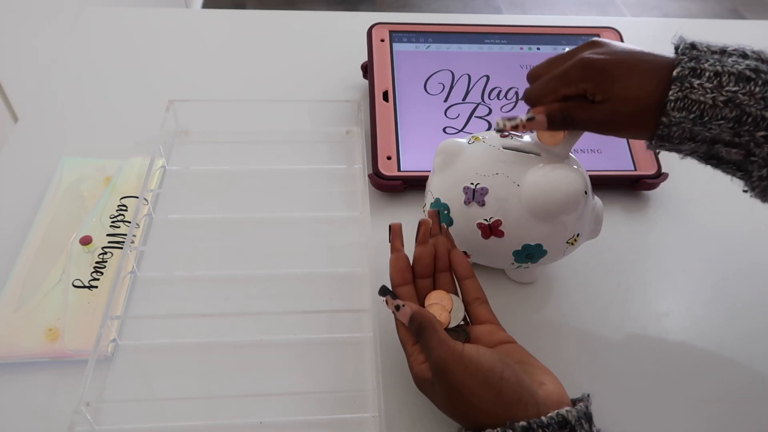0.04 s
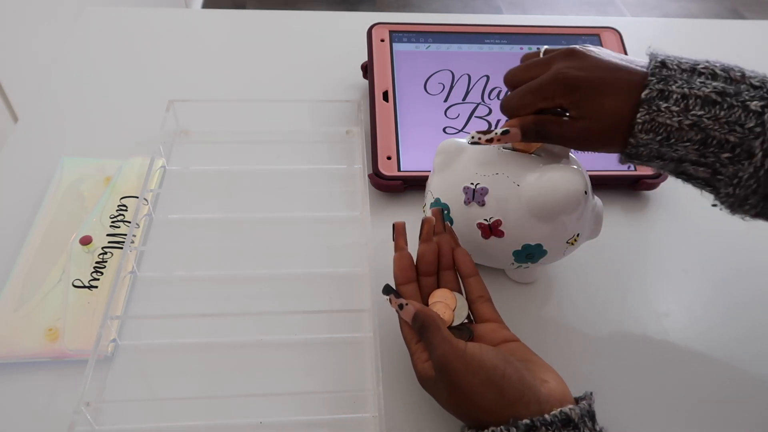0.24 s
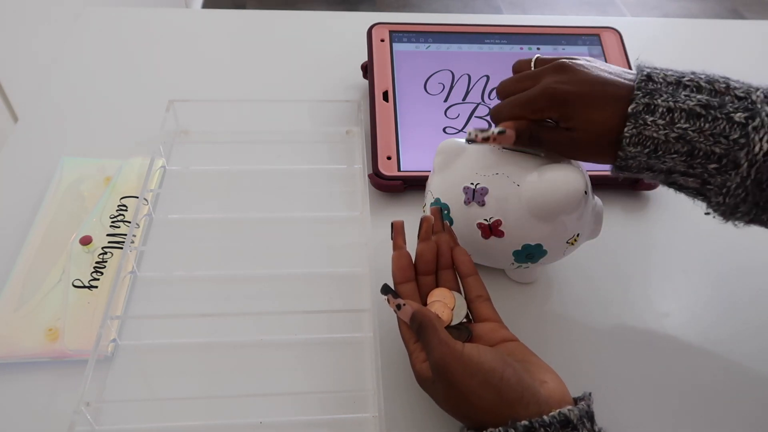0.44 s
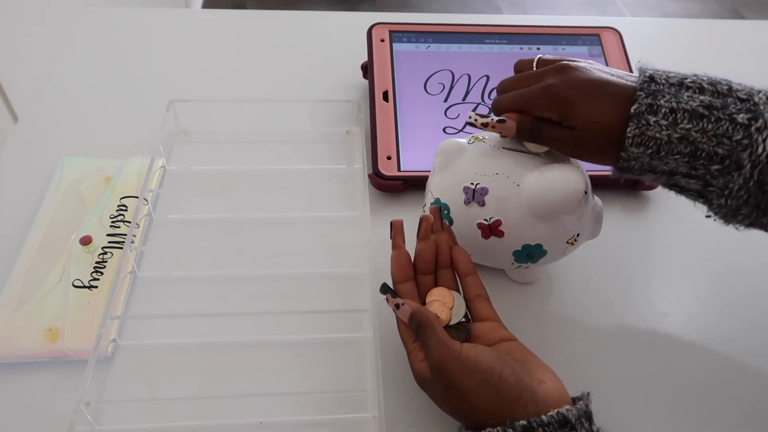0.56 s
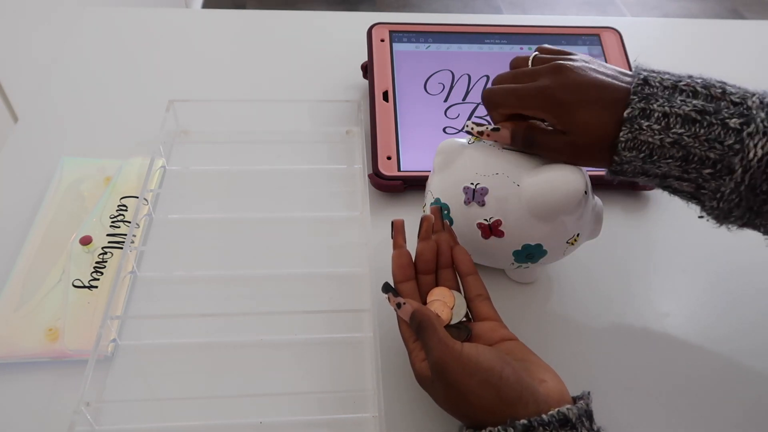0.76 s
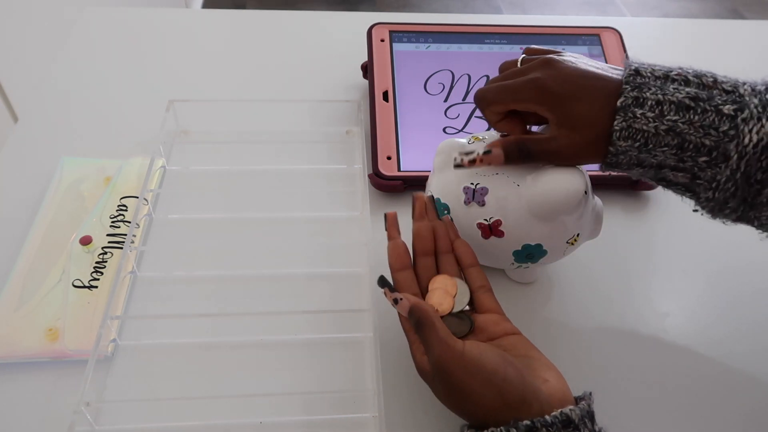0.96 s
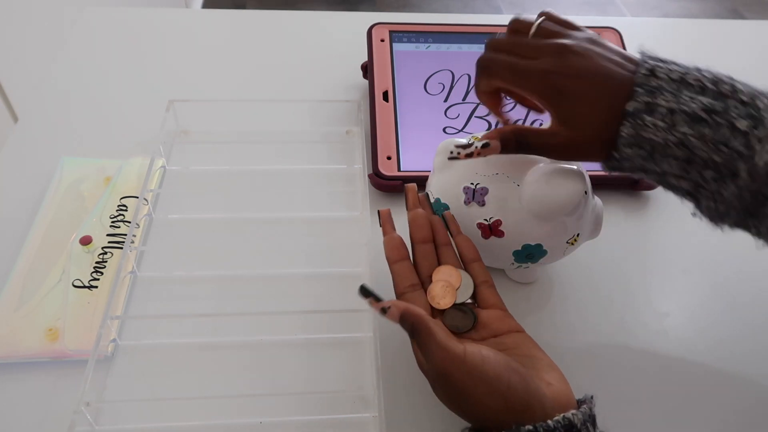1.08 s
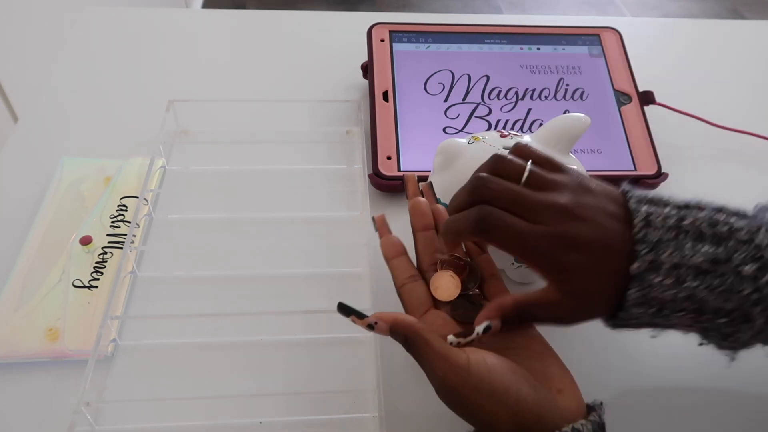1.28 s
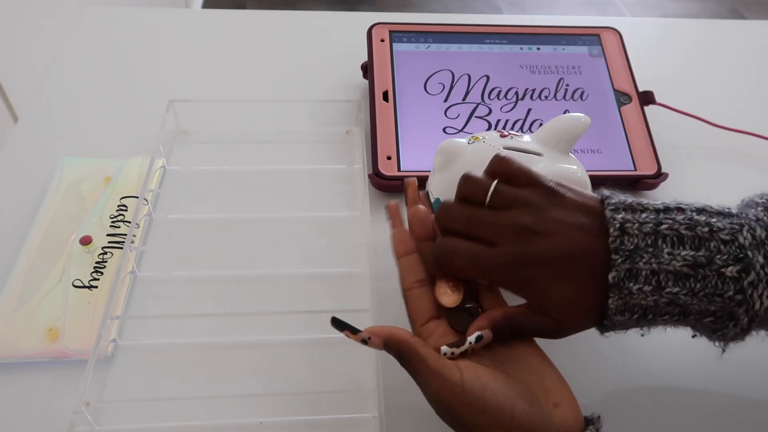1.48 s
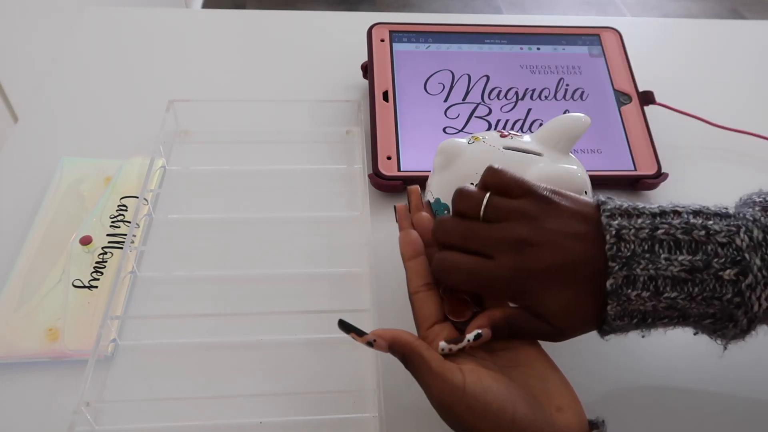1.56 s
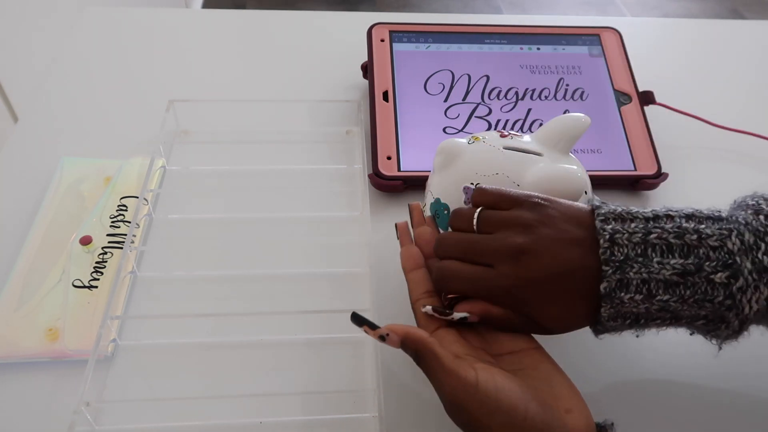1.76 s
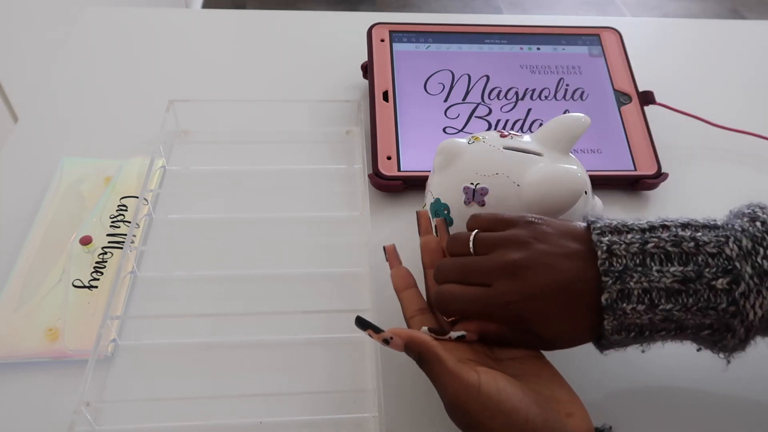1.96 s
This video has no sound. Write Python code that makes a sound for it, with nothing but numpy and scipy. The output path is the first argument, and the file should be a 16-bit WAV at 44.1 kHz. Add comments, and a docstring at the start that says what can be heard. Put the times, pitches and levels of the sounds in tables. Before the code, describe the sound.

Coins dropping into a ceramic piggy bank, clinking and thudding, then faint clicks in a palm

```python
"""Coins into a ceramic piggy bank

Coins are fed one by one into a bank on a table: each ticks against the slot, lands with a thud and clinks
over the coins inside. Then fingers with long nails pick through the coins left in the palm.
Shell, coins and table are decaying sine modes; contacts, slide, sleeve and air are shaped noise.
Each contact and the slide get nearby reflections and a bare room's tail in stereo."""
import sys
import numpy as np
from scipy import signal
from scipy.fft import rfft, irfft, next_fast_len
from scipy.io import wavfile
from scipy.ndimage import uniform_filter1d

SR = 44100
rng = np.random.default_rng(int(sys.argv[2]) if len(sys.argv) > 2 else 0)


def generate_wav(signal):
    """Clip the signal to [-1, 1] and save it as 16-bit WAV at the path in sys.argv[1]."""
    frames = np.transpose(np.atleast_2d(signal))
    scaled = np.clip(frames, -1, 1) * 32767
    pcm = np.round(scaled).astype(np.int16)
    wavfile.write(sys.argv[1], SR, pcm)


N = 89170
T = np.arange(int(0.7 * SR)) / SR  # time axis of one event, s
RING_ATTACK_S = 0.00041  # onset of every shell and coin ring
COIN_SPREAD = 0.0111  # random detuning of coin modes, fraction of pitch
BANK_LEAD_S, PALM_LEAD_S = 0.000014, 0.000017  # how far the left channel leads
THUD_WET_DB, PALM_WET_DB = -1, -3  # trim of the room tail

# modes of the ceramic shell: pitch_hz, level_db (relative), t60_s
SHELL_MODES = [(3654, -12, 0.021), (3920, -7.5, 0.032), (4048, -0.5, 0.035), (4077, -2, 0.02),
               (4344, -6.5, 0.018), (4525, 0, 0.039), (4588, -2, 0.052), (4870, -6, 0.029),
               (5060, -14, 0.025), (5875, -20.5, 0.042)]
# stereo width of room and sleeve: frequency_hz, side_db (against the middle)
DIFFUSE_WIDTH = [(30, -10), (70, -48), (150, -58), (350, -30), (700, -27), (1400, -23), (2800, -15.5),
                 (4400, -6), (6500, -1.5), (9000, 2.5), (14000, 4)]


def amp(db):
    """Decibels to gain."""
    return 10 ** (np.asarray(db) / 20)


def unit(x):
    """Scaled to rms 1."""
    return x / np.sqrt(np.mean(x ** 2) + 1e-20)


def along(points, hz):
    """Read (Hz, value) points on a log frequency axis."""
    f, value = np.transpose(points)
    return np.interp(np.log(hz + 1), np.log(f + 1), value)


def filtered(x, response):
    """Multiply the spectrum of x by a response of frequency."""
    n = x.shape[-1]
    m = next_fast_len(n + 4096)
    return irfft(rfft(x, m) * response(np.fft.rfftfreq(m, 1 / SR)), m)[..., :n]


def noise(spectrum, size):
    """Coloured noise of rms 1."""
    white = rng.standard_normal(size)
    return unit(filtered(white, lambda hz: amp(along(spectrum, hz))))


def fade(t, t60):
    """Exponential decay, 60 dB down after t60 seconds."""
    return np.exp(-np.log(1000) * t / t60)


def swell_of(points):
    """Gain per sample from (s, dB) points."""
    return amp(np.interp(np.arange(N) / SR, *np.transpose(points)))


def ring(modes, attack_s, tilt_db=0, detune=0):
    """Struck body as decaying sines, their balance a little different at every blow."""
    hz, db, t60 = np.transpose(modes)[:, :, None]
    scatter_db = 1.5 * rng.standard_normal(hz.shape)
    gain = amp(db + scatter_db + tilt_db * np.log2(hz / hz.mean()))
    pitch = hz * (1 + detune * rng.standard_normal(hz.shape))
    phase = (detune > 0) * rng.uniform(0, 2 * np.pi, hz.shape)  # random only for detuned bodies
    waves = np.sin(2 * np.pi * pitch * T + phase)
    body = (gain * waves * fade(T, t60)).sum(0) / np.linalg.norm(gain)
    return body * (1 - np.exp(-T / attack_s))


def burst(spectrum, t60):
    """The short decaying noise of a contact."""
    return noise(spectrum, len(T)) * fade(T, t60)


def spread(pair, width):
    """Two unrelated signals, as middle and side, make diffuse stereo of a given width per frequency."""
    side = filtered(pair[1], lambda hz: amp(along(width, hz)))
    return np.array([pair[0] + side, pair[0] - side])


def add(out, s, x, wet_db, lead_s=0):
    """Place a sound at time s, left channel leading, with nearby reflections and its own room tail."""
    # decay of the room: frequency_hz, t60_s
    room_t60 = [(100, 0.27), (400, 0.57), (1500, 0.71), (4500, 0.55), (9000, 0.46), (15000, 0.16)]
    # tail against the direct sound, ahead of the wet_db trim: frequency_hz, level_db
    room_level = [(100, 2), (250, -3.5), (600, 3.5), (1500, -1), (4500, -3.5), (8000, -4.5), (15000, -3.5)]
    early_s, early_db, early_side_db = 0.014, -8.5, 2  # decay time, level, extra width

    hz, t, z = signal.stft(rng.standard_normal((2, len(T))), SR, nperseg=256)
    t60 = along(room_t60, hz)[:, None]
    energy_norm = np.sqrt(2 * np.log(1000) / (t60 * SR))
    shape = fade(t, t60) * amp(along(room_level, hz))[:, None] * energy_norm
    tail = signal.istft(z * shape, SR, nperseg=256)[1][:, :len(T)]
    tail = tail * (1 - np.exp(-T / 0.0011))  # soft onset

    early = rng.standard_normal((2, len(T))) * np.exp(-T / early_s) * np.sqrt(2 / (early_s * SR))
    early = filtered(early, lambda f: f / (f + 1500))  # reflections thin out in the bass
    early = early * amp([[early_db], [early_db + early_side_db]])

    room = spread(amp(wet_db) * tail + early, DIFFUSE_WIDTH)
    wet = signal.fftconvolve(x[None], room, axes=1)[:, :len(x)]
    # half the lead as an advance on the left, half as a delay on the right
    direct = filtered(x, lambda f: np.exp(1j * np.pi * f * lead_s * np.array([[1], [-1]])))
    i = max(0, round(s * SR))
    out[:, i:i + len(x)] += (direct + wet)[:, :N - i]


def slot_taps():
    """A coin on the rim or wall rings the ceramic shell, with a noisy crack at the contact."""
    # blows: start_s, ring_db, crack_db, tilt_db_per_octave
    taps = [(0.0179, -22, -29.5, 3), (0.0413, -13.5, -27, 1), (.053, -36, -30, 0),
            (0.2309, -14.5, -15.5, -46), (0.2579, -16, -16, -14), (0.3172, -23, -38, -36),
            (.3516, -24, -31.5, 21), (0.5082, -10.5, -19, 21), (.511, -16, -37, 8), (0.574, -21, -39, 12),
            (0.7873, -16, -23, 11), (0.851, -25.5, -48, 22), (0.9144, -34, -37, 12),
            (0.9458, -33, -35.5, -8), (1.04, -27.5, -26, 23)]
    # colour of the crack: frequency_hz, density_db_per_hz (relative)
    crack_colour = [(200, 2), (800, 2.5), (1500, 1), (2500, -9), (4500, 9.5), (7000, -7), (11000, -6.5),
                    (14000, -21), (16000, -33)]
    out = np.zeros((2, N))
    for s, ring_db, crack_db, tilt_db in taps:
        shell = amp(ring_db) * ring(SHELL_MODES, RING_ATTACK_S, tilt_db, detune=0.0028)
        crack = amp(crack_db) * burst(crack_colour, t60=0.02)
        add(out, s, shell + crack, wet_db=-2, lead_s=0.000009)
    return out


def heap_clinks():
    """A coin on the heap rings coins and shell and sets its neighbours rattling, as decaying noise."""
    # blows: start_s, coin_ring_db, shell_ring_db, clatter_db, coin_tilt_db_per_octave
    clinks = [(0.029, -25, -23, -23.5, -10), (.1485, -18, -14.5, -16, 9), (0.1944, -10, -14, -16.5, -10.5),
              (0.2593, -31, -44, -27, -14), (.275, -19, -18, -21, -33), (0.295, -28, -24, -32, -10),
              (0.314, -26.5, -24, -26, 5), (.349, -34, -24.5, -25, 37), (0.5819, -16.5, -21, -17.5, 3.5),
              (.586, -35, -20.5, -22, -7), (0.6336, -12, -14.5, -23.5, -17),
              (0.6361, -18, -15.5, -16.5, -15), (.673, -33, -42, -20, -2), (1.038, -27.5, -36, -32.5, 9),
              (1.1239, -15.5, -21.5, -18, 18), (1.139, -17.5, -19.5, -24.5, 9), (1.154, -24, -30, -19, 15)]
    # modes of the coins in the heap: pitch_hz, level_db (relative), t60_s
    coin_modes = [(5160, -13, 0.046), (6095, -2, 0.018), (6693, 1, 0.03), (7187, -2, 0.03),
                  (7320, -16, 0.013), (7200, 3, 0.011), (8280, -12.5, 0.052), (9190, -10, 0.078),
                  (9660, -7, .03), (10000, -9, 0.055), (10720, -9, 0.058), (11130, -10.5, 0.025),
                  (12320, -7, 0.022), (13370, -11.5, 0.023)]
    # colour of the rattle: frequency_hz, density_db_per_hz (relative)
    clatter_colour = [(300, -7), (1400, -6.5), (2200, 1), (3000, 0), (5000, 2), (8000, -1.5), (11000, -9.5),
                      (14000, -10.5), (15500, -2)]
    out = np.zeros((2, N))
    for s, coin_db, shell_db, clatter_db, tilt_db in clinks:
        metal = amp(coin_db) * ring(coin_modes, RING_ATTACK_S, tilt_db, COIN_SPREAD)
        shell = amp(shell_db) * ring(SHELL_MODES, RING_ATTACK_S, tilt_db=-41, detune=0.0011)
        clatter = burst(clatter_colour, t60=0.011)
        clatter = clatter + amp(-14.5) * burst(clatter_colour, t60=0.16)  # longer, softer rattle
        add(out, s, metal + shell + amp(clatter_db) * clatter, wet_db=2, lead_s=BANK_LEAD_S)
    return out


def landings():
    """A coin hitting the bottom thumps the table's modes through the bank, with a hollow noise knock."""
    # falls: start_s, thump_db, knock_db, thump_tilt_db_per_octave
    falls = [(0.1474, -6, -10.5, -2), (.315, -22.5, -26, 5), (0.5822, -12.5, -16.5, 0.5),
             (.593, -21, -23, 2), (.634, -21, -20.5, 1.5), (1.1225, -11, -16, 0.5)]
    # modes of the table top under the bank: pitch_hz, level_db (relative), t60_s
    table_modes = [(119.5, -16, 0.076), (132.3, 0.5, 0.19), (152.2, -5.5, 0.12), (204.4, -8.5, 0.23),
                   (260.4, -3, 0.1236), (288.8, -9.5, 0.2), (327.2, -9, .14), (412.7, -18, 0.37),
                   (488.4, -13, 0.23), (533.5, -16.5, 0.17), (590, -21.5, 0.12), (744, -15, 0.28),
                   (877, -38, 0.3), (1035, -26.5, .1), (1536, -22, 0.12)]
    # colour of the hollow knock: frequency_hz, density_db_per_hz (relative)
    knock_colour = [(80, -56), (170, -13), (280, 8), (400, -4), (550, 0.5), (750, -8), (870, -4.5),
                    (1050, -4.5), (1600, -7), (2200, -26), (5000, -48)]
    out = np.zeros((2, N))
    for s, thump_db, knock_db, tilt_db in falls:
        thump = amp(thump_db) * ring(table_modes, attack_s=0.0032, tilt_db=tilt_db)
        knock = amp(knock_db) * burst(knock_colour, t60=0.025)
        add(out, s, thump + knock, THUD_WET_DB, BANK_LEAD_S)
    return out


def rocking():
    """The bank rocks softly on the table: a low tone with low noise, swelling, held, then dying away."""
    # nudges: start_s, length_s (until the decay starts), level_db
    nudges = [(.015, 0.029, -30.5), (.19, 0.062, -31.5), (.32, 0.031, -24), (.395, 0.012, -32),
              (.45, 0.079, -41), (.785, 0.024, -35.5), (.91, 0.086, -37), (1.03, 0.02, -37)]
    # colour of the rocking noise: frequency_hz, density_db_per_hz (relative)
    rocking_colour = [(70, -11), (115, -4), (135, 2), (160, -8.5), (200, -17), (270, -16.5), (400, -27.5),
                      (750, -22.5), (1500, -46.5)]
    out = np.zeros((2, N))
    for s, length_s, db in nudges:
        swell = (1 - np.exp(-T / 0.0069)) * fade(np.maximum(T - length_s, 0), t60=0.12)
        tone = np.sin(2 * np.pi * 133.4 * T)
        grit = amp(-7) * noise(rocking_colour, len(T))
        add(out, s, amp(db) * swell * (tone + grit), THUD_WET_DB)
    return out


def table():
    """Thumps and rocking together, thinned below the table's low limit."""
    low_cut = signal.butter(3, 97, "high", fs=SR, output="sos")
    return signal.sosfilt(low_cut, landings() + rocking())


def palm_picks():
    """Nails and coins click in the palm: short band noise and a coin ring damped by the hand."""
    # clicks: start_s, level_db, centre_hz
    picks = [(1.392, -49, 10800), (1.437, -49, 10900), (1.547, -33.5, 10900), (1.574, -40, 6700),
             (1.594, -31, 12000), (1.6091, -21.5, 11580), (1.618, -24, 11600), (1.629, -33, 11200),
             (1.6525, -27, 8730), (1.722, -36.5, 5630), (1.749, -36, 4870), (1.8011, -27.5, 7920),
             (1.810, -45, 9150), (1.886, -38.5, 2740)]
    # modes of a coin damped by the palm: multiple_of_centre, level_db (relative)
    damped_coin = [(.8, -3), (1, 4), (1.13, -11)]
    half_width_octaves = 0.59  # the click is half as strong in amplitude this far from its centre
    out = np.zeros((2, N))
    for s, db, centre_hz in picks:
        def band(f):
            octaves = np.log2((f + 1) / centre_hz)
            return 1 / (1 + (octaves / half_width_octaves) ** 2)

        click = unit(filtered(rng.standard_normal(len(T)), band)) * fade(T, t60=0.014)
        modes = [(k * centre_hz, level_db, 0.018) for k, level_db in damped_coin]  # t60 in s last
        metal = amp(-3.5) * ring(modes, RING_ATTACK_S, detune=COIN_SPREAD)
        add(out, s, amp(db) * (click + metal), PALM_WET_DB, PALM_LEAD_S)
    return out


def palm_slide():
    """Coins slide in the palm: scraping noise whose level flutters at random into grains."""
    # level of the slide: time_s, level_db
    slide = [(1.52, -112), (1.545, -57.5), (1.58, -47), (1.615, -40.5), (1.66, -48.5), (1.71, -60),
             (1.799, -48.5), (1.93, -76), (2.02, -62)]
    # colour of the scrape: frequency_hz, density_db_per_hz (relative)
    scrape_colour = [(500, -39), (2500, -17.5), (4500, -5), (5800, 4.5), (8000, -7.5), (10300, -12),
                     (11400, 4), (13200, -12), (15500, -17)]
    out = np.zeros((2, N))
    grain = unit(uniform_filter1d(rng.standard_normal(N), size=90))  # about 2 ms per grain
    scrape = unit(noise(scrape_colour, N) * amp(5.0 * grain))  # 5 dB rms flutter
    add(out, 0, scrape * swell_of(slide), PALM_WET_DB, PALM_LEAD_S)
    return out


def palm():
    """Clicks and slide in the hand, with the extreme treble rolled off."""
    top_hz = 13800
    return filtered(palm_slide() + palm_picks(), lambda hz: 1 / np.sqrt(1 + (hz / top_hz) ** 24))


def sleeve():
    """The sleeve brushes the table: wide cloth noise under a slow swell."""
    # level of the brush: time_s, level_db
    brush = [(1.9, -64), (1.96, -59), (2.02, -49.5)]
    # colour of the cloth: frequency_hz, density_db_per_hz (relative)
    cloth_colour = [(100, -8), (400, -6), (1500, -4.5), (4000, -8.5), (9000, -13), (14000, -41)]
    return swell_of(brush) * spread(noise(cloth_colour, (2, N)), DIFFUSE_WIDTH)


def room_air():
    """The quiet air of the room: steady, mostly low noise in stereo."""
    # colour of the air: frequency_hz, density_db_per_hz (relative)
    air_colour = [(25, -4.5), (52, 8.5), (80, -3), (150, -5.5), (300, -7.5), (700, -12.5), (1500, -18.5),
                  (4000, -19), (9000, -26), (13000, -31.5), (16000, -68)]
    # stereo width of the air: frequency_hz, side_db (against the middle)
    air_width = [(60, -24), (110, -26), (200, -1), (1300, 0.5), (4000, -2.5), (12000, 8)]
    return amp(-54.5) * spread(noise(air_colour, (2, N)), air_width)


def scene():
    """Bank, table, hand and sleeve over the quiet air of the room."""
    return slot_taps() + heap_clinks() + table() + palm() + sleeve() + room_air()


def record(dry):
    """The recorder keeps next to nothing above its band limit."""
    top_hz = 15600
    return filtered(dry, lambda hz: 1 / np.sqrt(1 + (hz / top_hz) ** 100))


dry = scene()
out = record(dry)
generate_wav(out)
```